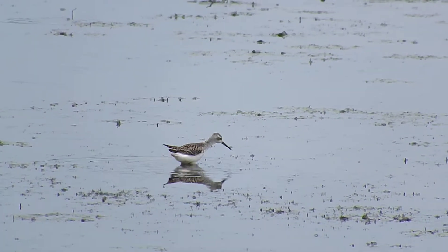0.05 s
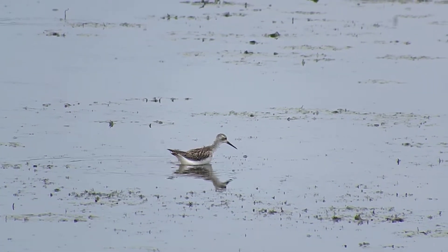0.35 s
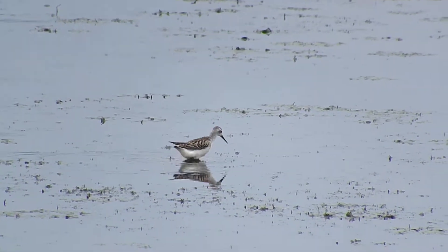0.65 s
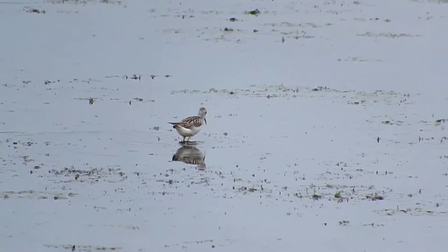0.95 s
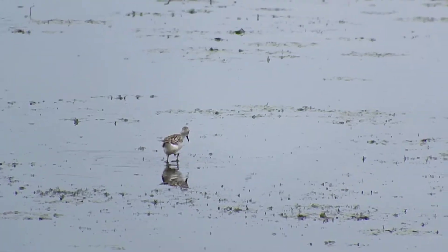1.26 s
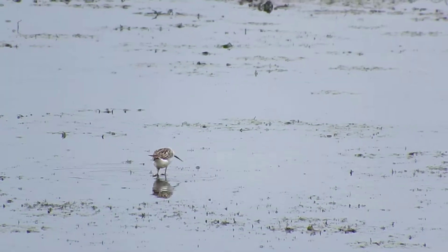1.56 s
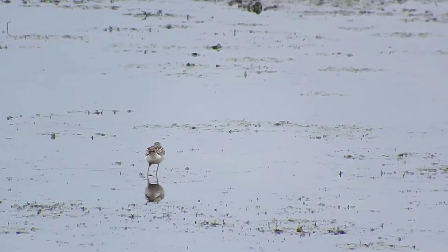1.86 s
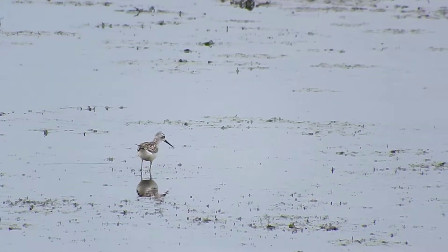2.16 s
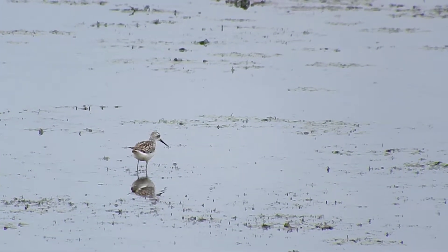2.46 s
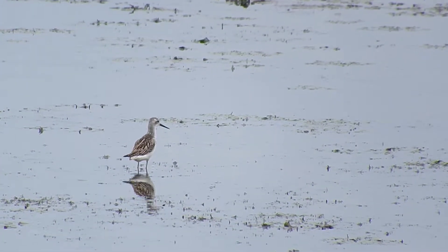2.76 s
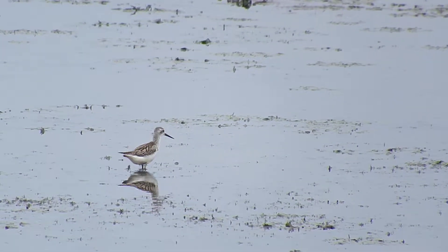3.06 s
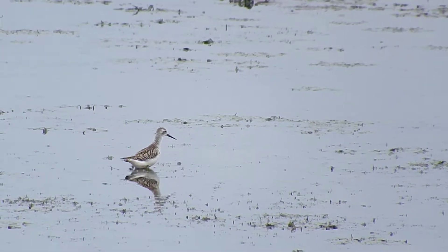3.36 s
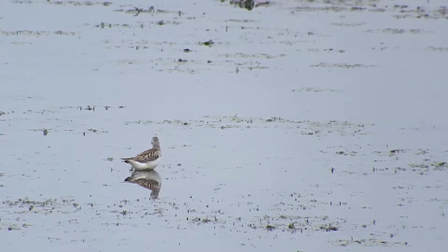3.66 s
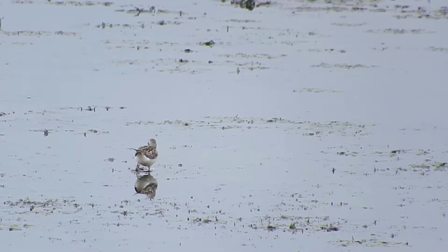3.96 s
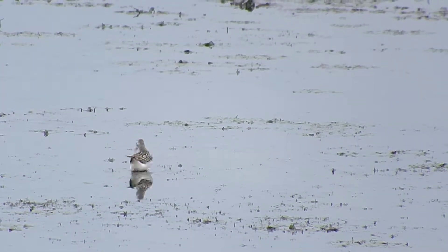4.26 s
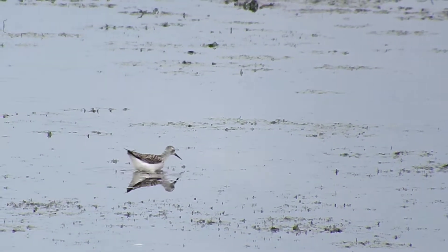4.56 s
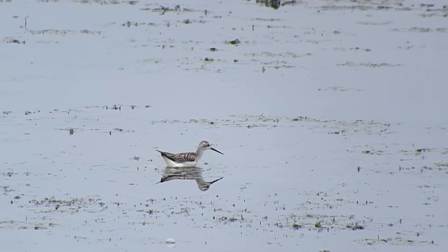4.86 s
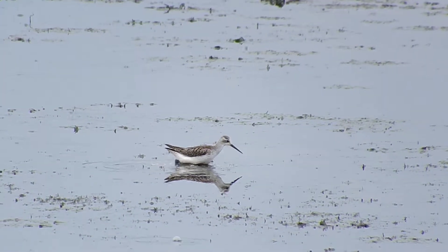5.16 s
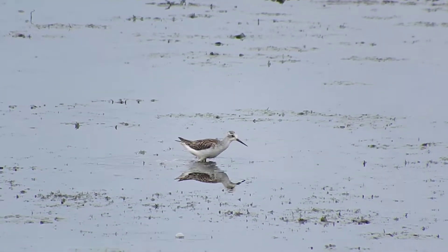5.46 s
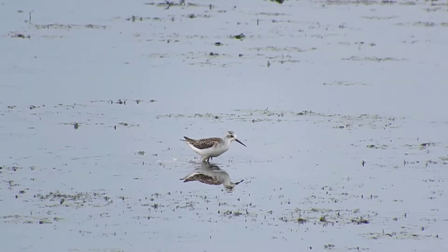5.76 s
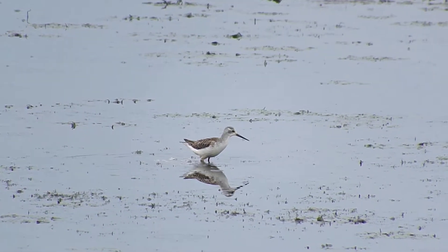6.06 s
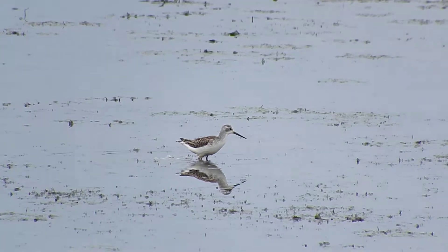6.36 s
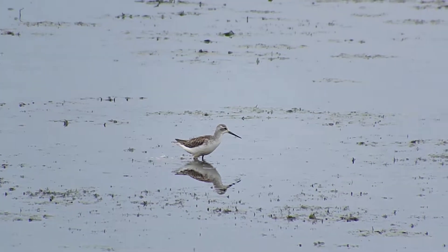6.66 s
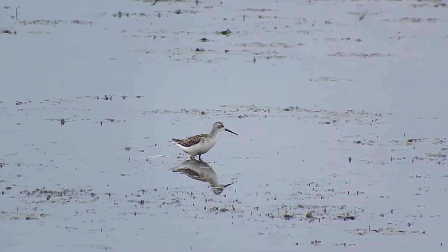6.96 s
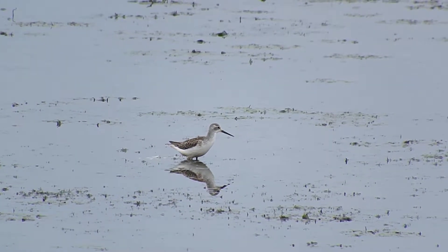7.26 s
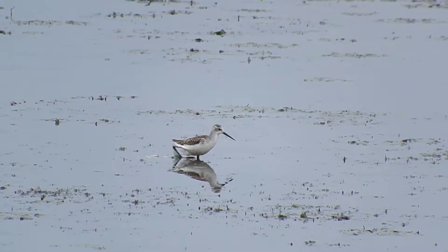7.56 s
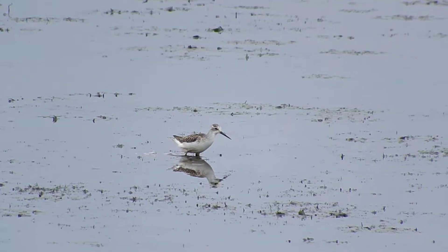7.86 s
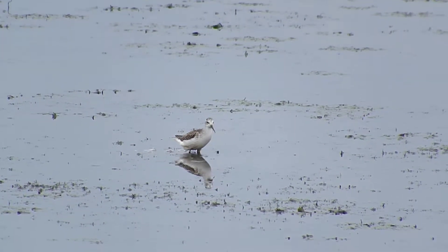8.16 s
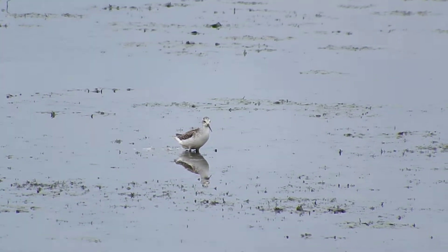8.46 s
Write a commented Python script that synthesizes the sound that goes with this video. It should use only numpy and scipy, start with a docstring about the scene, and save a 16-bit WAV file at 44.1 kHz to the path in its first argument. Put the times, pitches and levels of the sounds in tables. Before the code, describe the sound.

Outdoors by shallow water, a high, continuous cicada chorus pulses with short buzzing phrases from closer insects. Behind it sit a faint far rumble and the hiss and whir of the camera. A brief clatter of light knocks close to the microphone comes first, then a single faint upward bird whistle. Later a distant engine adds a barely audible thin tone, and the camera is softly bumped a few more times.

```python
"""A chorus of cicadas sizzles in the trees beyond a shallow pond. Nearer ones sing short phrases,
mostly climbing, and the chorus swells with each. A cicada buzzes by clicking its timbals (small
drum skins) hundreds of times a second, which rings its hollow body. Underneath lie a faint far
rumble and the whir and hiss of a camera, whose housing rings with a few light knocks.
One far bird gives a short rising note, and later the thin drone of a far engine fades in."""
import sys
import numpy as np
from scipy import signal
from scipy.fft import rfft, irfft, next_fast_len
from scipy.io import wavfile
from scipy.ndimage import map_coordinates

SR = 44100
rng = np.random.default_rng(int(sys.argv[2]) if len(sys.argv) > 2 else 0)


def output_pcm(signal):
    """Save a mono or channel-first signal as 16-bit PCM at the path in sys.argv[1].

    Samples are clipped to [-1, 1] before scaling.
    """
    pcm = np.clip(np.atleast_2d(signal).T, -1, 1) * 32767
    wavfile.write(sys.argv[1], SR, np.round(pcm).astype(np.int16))


N = 384552

# Tone of the farthest insects, blurred into a wash: frequency_hz, level_db
WASH_TONE = [(900, -65), (1600, -23.5), (2200, -16.5), (3000, -9), (3500, -1), (4150, 0), (4600, -3),
             (5000, -9.5), (5600, -13.5), (6100, -16.5), (6600, -17.5), (7450, -33.5), (8000, -48),
             (10000, -64)]
# The low voices sing harder at first, ease off, then slowly recover a little: time_s, boost_db
LOW_VOICE_EFFORT = [(0, 1.5), (1.65, 1.5), (1.9, 0.04), (4.6, 0.05), (8.72, .5)]
# Phrases of the near cicadas:
# start_s, length_s, click_rate_hz, rate_rise_hz, body_pitch_hz, level_db, chorus_swell_db
NEAR_PHRASES = [(-.2, 0.51, 366, 5.5, 4330, -44, 2.5), (.45, 0.88, 335, 21, 3700, -45.5, 1.5),
                (1.13, 0.64, 368.6, 16.5, 4810, -45.5, 2), (1.98, 0.57, 383, 2, 4450, -48.5, 3),
                (2.55, .6, 398, 3, 4480, -55, 3.5), (3.03, .8, 347, 5.5, 4350, -51, 4.5),
                (3.742, 0.42, 353.5, 4, 4300, -43, 5), (4.06, 0.94, 341.3, 8.5, 4200, -51, 3),
                (4.878, 1.15, 323, 16.5, 4600, -56, 1.7), (6.104, 0.55, 339, 2.5, 4480, -48.5, 3.5),
                (6.68, 0.53, 308, 19, 4500, -53, 3.5), (6.98, .85, 379, 23.5, 4550, -45.5, 3.5),
                (7.89, 0.39, 380.4, -2, 4580, -44, 3.5), (8.4, 0.43, 362, 6.5, 4370, -48, 3)]
# How much louder the trees sound on the left than on the right: frequency_hz, boost_db
LEFT_BOOST = [(1500, -0.5), (2600, 1.6), (3100, 0.8), (3850, 2), (4200, 1.5), (5250, 3), (5750, -1),
              (6150, -7), (6550, 3), (8000, 3)]
# How far their sound waves are ahead on the left: frequency_hz, lead_radians
LEFT_LEAD = [(0, 0), (2900, .08), (3550, .4), (5500, .42), (6300, 2.4), (6800, 2.3), (7500, 3.1), (9000, 6)]
# Tone of the far rumble: frequency_hz, level_db
RUMBLE_TONE = [(25, -58), (50, -54), (100, -21), (160, -8.5), (250, 9), (380, 2), (550, 3.5), (690, 6.5),
               (850, 2), (1300, 0.5), (2000, 0), (5000, -27.5)]
# Tone of the microphone hiss: frequency_hz, level_db
HISS_TONE = [(40, -27), (700, 8), (2500, -10.5), (7000, 7), (8400, 6.5), (9500, 0.5), (12000, -1.5),
             (15700, -9)]
# Narrow bands of noise in the camera's whir: pitch_hz, half_width_hz, relative_level_db
WHIR_BANDS = [(273.8, 25, -54), (303.5, 8.2, -60), (621.6, 10, -61.5), (1185.5, 7.2, -64.5)]
# Light knocks on the camera: start_s, peak_before_bass_cut_db, brightness_hz
CAMERA_KNOCKS = [(.464, -36, 2500), (0.49, -38, 800), (.502, -24, 4500), (.505, -27.5, 1800),
                 (1.309, -42, 350), (4.519, -43, 610), (5.519, -42, 550), (5.679, -38, 650),
                 (6.539, -41, 160)]
# Notes at which its housing rings: pitch_hz, relative_level_db, ring_s (time to fade by 60 dB)
HOUSING_NOTES = [(159, -24, 0.028), (324, -15, 0.024), (455, -0.5, 0.022), (670, -4, 0.018),
                 (1040, 6.5, 0.013), (1570, 4, 0.01), (2210, 3, .012), (2880, 7, 0.016), (5570, 2, .005)]
# Narrow bands that the camera cuts out: centre_hz, width_hz
CAMERA_DIPS = [(220, 98), (1100, 294)]


def amp(db):
    """Turn decibels into a number to multiply a sound by."""
    return 10 ** (np.asarray(db) / 20)


def unit(sound):
    """Scale a sound so that its average strength (rms) is 1."""
    return sound / np.sqrt(np.mean(sound ** 2) + 1e-20)


def tone_gain(points, hz):
    """Read the gain at hz from a table of frequency_hz, level_db."""
    points_hz, db = np.transpose(points)
    return amp(np.interp(np.log(hz + 1), np.log(points_hz), db))


def wobble(per_second, size=N):
    """A smooth random curve that passes through per_second random values each second."""
    values = rng.standard_normal(int(N * per_second / SR) + 4)
    return map_coordinates(values, [np.arange(size) * per_second / SR])


def filtered(sound, response):
    """Change a sound's tone: multiply each frequency in it by response(hz)."""
    size = sound.shape[-1]
    padded = next_fast_len(size + 8192)
    hz = np.fft.rfftfreq(padded, 1 / SR)
    return irfft(rfft(sound, padded) * response(hz), padded)[..., :size]


def band(centre_hz, half_width_hz, steepness):
    """A filter response that keeps the frequencies near centre_hz."""
    return lambda hz: 1 / (1 + ((hz - centre_hz) / half_width_hz) ** steepness)


def stereo_noise(response, side_db):
    """Filtered noise; the lower side_db is, the more alike left and right sound."""
    middle, side = filtered(rng.standard_normal((2, N)), response) * amp([[0], [side_db]])
    return unit(np.array([middle + side, middle - side]))


def add(track, start_s, sound):
    """Mix a sound into a track; a start below zero means it is already under way."""
    at = round(start_s * SR)
    sound = sound[max(-at, 0):]
    part = track[max(at, 0):][:len(sound)]
    part += sound[:len(part)]


def timbal_clicks(rate_hz, jitter_cycles=.0022, scatter_db=1, max_clicks=600):
    """The timbals snap at a changing rate, each click a little off in time and strength."""
    size = len(rate_hz)
    cycles = np.cumsum(rate_hz) / SR
    late, strength = rng.standard_normal((max_clicks, 2))[:int(cycles[-1])].T
    click_at = np.interp(np.arange(len(late)) + jitter_cycles * late, cycles, np.arange(size))
    # a click falls between samples, so spread it over the 16 nearest
    nearby = click_at.astype(int)[:, None] + np.arange(-7, 9)
    offset = nearby - click_at[:, None]
    shape = np.sinc(offset) * np.cos(np.pi * offset / 16) ** 2
    clicks = shape * amp(scatter_db * strength)[:, None]
    return np.bincount(np.clip(nearby, 0, size - 1).ravel(), clicks.ravel(), size)


def cicada_phrase(length_s, first_hz, last_hz, body_hz, flutter_db=2.5):
    """Clicks ring one insect's hollow body; the buzz swells and fades while the click rate glides."""
    progress = np.linspace(0, 1, round(length_s * SR))
    rate_hz = first_hz + (last_hz - first_hz) * np.sin(np.pi * progress / 2) ** 2
    clicks = timbal_clicks(rate_hz * (1 + .001 * wobble(40, len(progress))))
    buzz = filtered(clicks, band(body_hz, half_width_hz=506, steepness=4))
    # moving air makes the buzz flutter on its way
    buzz = unit(buzz * amp(flutter_db * wobble(16, len(progress))))
    rise_and_fall = np.abs(np.sin(np.pi * progress ** 1.3)) ** .7
    return buzz * rise_and_fall


def chorus_swell_db(join_s=.15, leave_s=.22):
    """Neighbours join in with each near phrase, hold, and drop out as it ends."""
    t = np.arange(N) / SR
    swell_db = np.zeros(N)
    for start_s, length_s, *_, db in NEAR_PHRASES:
        joined = np.minimum((t - start_s) / join_s, (start_s + length_s - t) / leave_s)
        swell_db += db * np.clip(joined, 0, 1)
    return swell_db


def cicada_chorus(count=120, high_db=-43.5, low_db=-42, low_swell_share=.098):
    """Many insects sing overlapping phrases, mostly rising; the farthest merge into a wash."""
    buzz = np.zeros(N)
    for turn, (delay, length, pitch, rise, body) in enumerate(rng.random((count, 5))):
        first_hz = 320 + 90 * pitch
        last_hz = first_hz * (.997 + .016 * rise)
        voice = cicada_phrase(.14 + .1 * length, first_hz, last_hz, body_hz=3700 + 750 * body)
        # they take turns, so the sizzle never breaks off
        add(buzz, (turn + .5 * delay - 1) / count * N / SR, voice)
    wash = unit(filtered(rng.standard_normal(N), lambda hz: tone_gain(WASH_TONE, hz)))
    everyone = wash + amp(-4) * unit(buzz)
    high_voices = filtered(everyone, band(4620, half_width_hz=620, steepness=8))
    low_voices = everyone - high_voices
    # the high voices take the full swell, the rest stay steadier
    swell_db = chorus_swell_db()
    effort_db = np.interp(np.arange(N) / SR, *np.transpose(LOW_VOICE_EFFORT))
    low_gain = amp(low_db + effort_db + low_swell_share * swell_db)
    return amp(high_db + swell_db) * unit(high_voices) + low_gain * unit(low_voices)


def near_cicadas():
    """Single insects close by stand out of the chorus."""
    track = np.zeros(N)
    for start_s, length_s, rate_hz, rise_hz, body_hz, db, _ in NEAR_PHRASES:
        add(track, start_s, amp(db) * cicada_phrase(length_s, rate_hz, rate_hz + rise_hz, body_hz))
    return track


def from_the_trees(sound, scatter_db=-19, echo_s=.31):
    """The insects sit a little to the left; leaves scatter some of their sound all round."""
    t = np.arange(SR // 5) / SR
    echo = rng.standard_normal(len(t)) * amp(-60 * t / echo_s)
    scattered = amp(scatter_db) * signal.fftconvolve(sound, echo / np.linalg.norm(echo))[:N]
    sides = np.array([[1], [-1]])  # left, right

    def placement(hz):
        """Share the boost and the lead: half goes to the left, the opposite half to the right."""
        lead_radians = np.interp(hz, *np.transpose(LEFT_LEAD))
        return tone_gain(LEFT_BOOST, hz) ** (sides / 2) * np.exp(.5j * sides * lead_radians)

    return filtered(sound, placement) + scattered * sides


def far_rumble(level_db=-55):
    """A low, almost steady rumble comes from far over the water."""
    gain = amp(level_db + .17 * wobble(4.4))
    return gain * stereo_noise(lambda hz: tone_gain(RUMBLE_TONE, hz), side_db=-10)


def microphone_hiss(level_db=-67):
    """Each of the two microphones makes its own even hiss."""
    hiss = filtered(rng.standard_normal((2, N)), lambda hz: tone_gain(HISS_TONE, hz))
    return amp(level_db) * unit(hiss)


def camera_whir(gain_db=-7):
    """The camera hums at a few fluttering pitches, nearly alike on both sides."""
    return sum(amp(db + gain_db) * stereo_noise(band(hz, half_width_hz, steepness=2), side_db=-20)
               for hz, half_width_hz, db in WHIR_BANDS)


def camera_knocks(attack_s=.00037, bass_cut_hz=150):
    """Short blows ring the camera's housing; soft ones stir mostly its low notes."""
    track = np.zeros(N)
    t = np.arange(SR // 10) / SR
    for start_s, peak_db, brightness_hz in CAMERA_KNOCKS:
        ring = np.zeros(len(t))
        for hz, db, ring_s in HOUSING_NOTES:
            fade = amp(db + rng.normal(0, 2) - 60 * t / ring_s)
            strength = rng.choice([-1, 1]) / (1 + (hz / brightness_hz) ** 2)
            ring += strength * fade * np.cos(2 * np.pi * hz * t)
        ring *= 1 - np.exp(-t / attack_s)
        add(track, start_s, amp(peak_db) * ring / np.abs(ring).max())
    # the light housing gives no deep bass
    return signal.sosfilt(signal.butter(3, bass_cut_hz, "highpass", fs=SR, output="sos"), track)


def far_bird(start_s=1.41, length_s=.11, first_hz=1760, last_hz=1950, level_db=-52.5):
    """A bird gives one faint, slightly rough whistle that slides upward."""
    progress = np.linspace(0, 1, round(length_s * SR))
    phase = 2 * np.pi * np.cumsum(first_hz + (last_hz - first_hz) * progress) / SR
    whistle = np.sin(phase + .5 * wobble(156, len(progress)))
    track = np.zeros(N)
    add(track, start_s, amp(level_db) * np.sin(np.pi * progress) * whistle)
    return track


def far_engine(start_s=2.6, fade_s=.82, pitch_hz=452, climb_hz_per_s=1.5, waver_hz=6, level_db=-69.5):
    """A far engine fades in as one thin, wavering tone that creeps upward."""
    t = np.arange(N) / SR - start_s
    phase = 2 * np.pi * np.cumsum(pitch_hz + climb_hz_per_s * t + waver_hz * wobble(12)) / SR
    fade_in = np.clip(t / fade_s, 0, 1)
    return amp(level_db) * fade_in * unit(np.sin(phase))


def scene():
    """Cicadas over a quiet background, joined by the knocks, the bird and the engine."""
    cicadas = from_the_trees(cicada_chorus() + near_cicadas())
    background = far_rumble() + microphone_hiss() + camera_whir()
    return cicadas + background + camera_knocks() + far_bird() + far_engine()


def record(dry):
    """The camera cuts out two narrow bands and the very highest treble."""
    def response(hz, top_hz=15730):
        """Falls to zero at the centre of each dip and above top_hz."""
        dips = [(centre_hz ** 2 - hz ** 2) / (centre_hz ** 2 - hz ** 2 + 1j * hz * width_hz)
                for centre_hz, width_hz in CAMERA_DIPS]
        return np.prod(dips, axis=0) * (hz < top_hz)

    return filtered(dry, response)


dry = scene()
out = record(dry)
output_pcm(out)
```